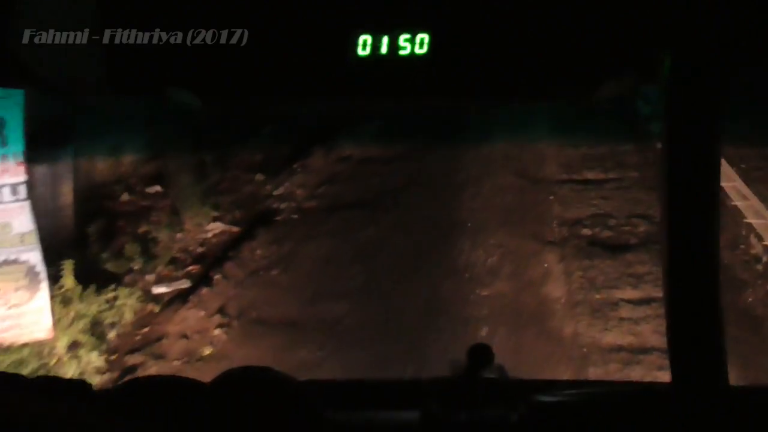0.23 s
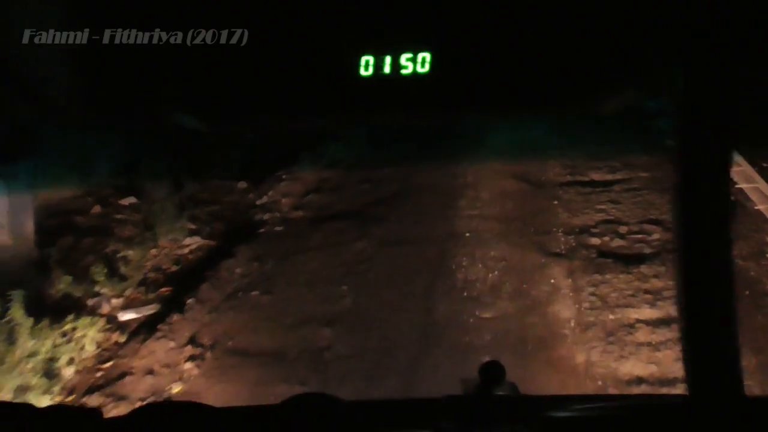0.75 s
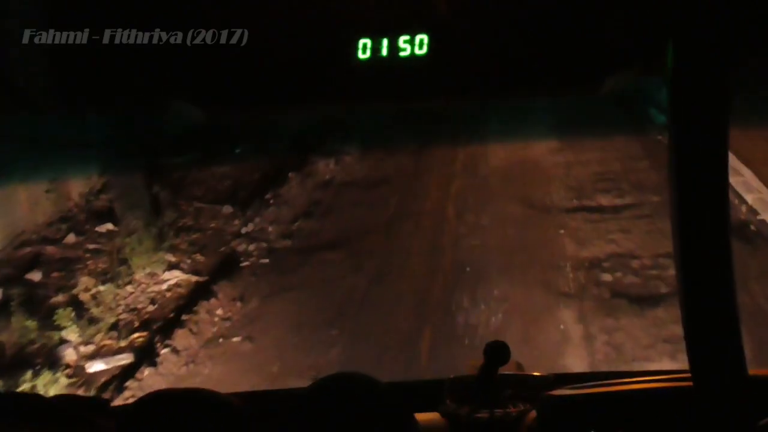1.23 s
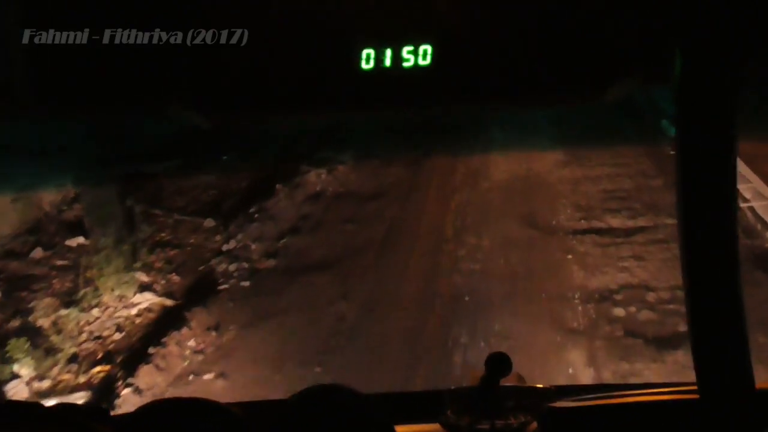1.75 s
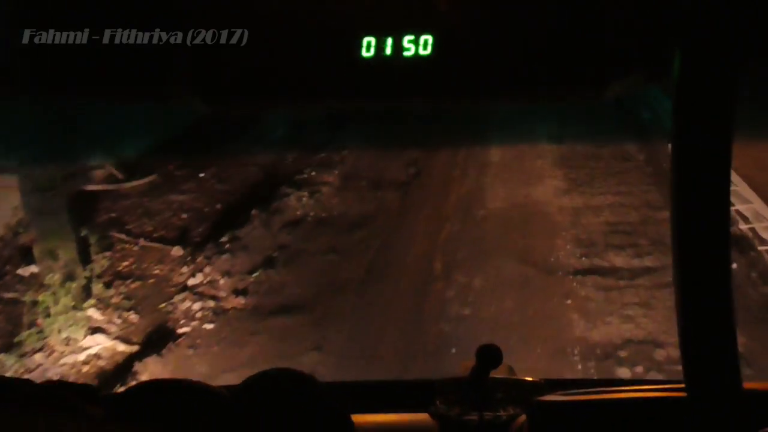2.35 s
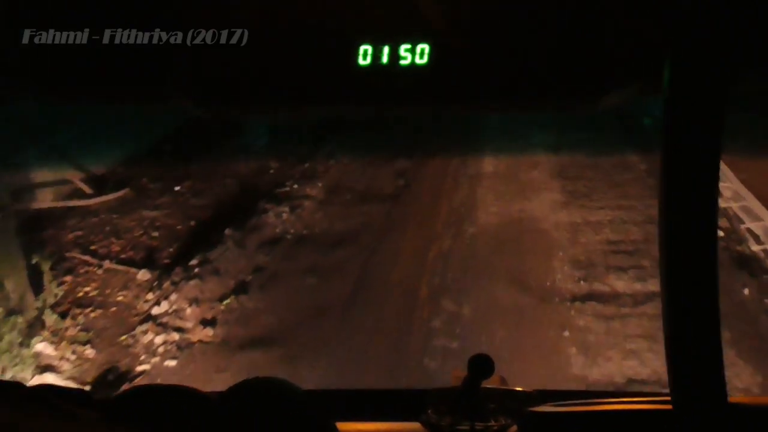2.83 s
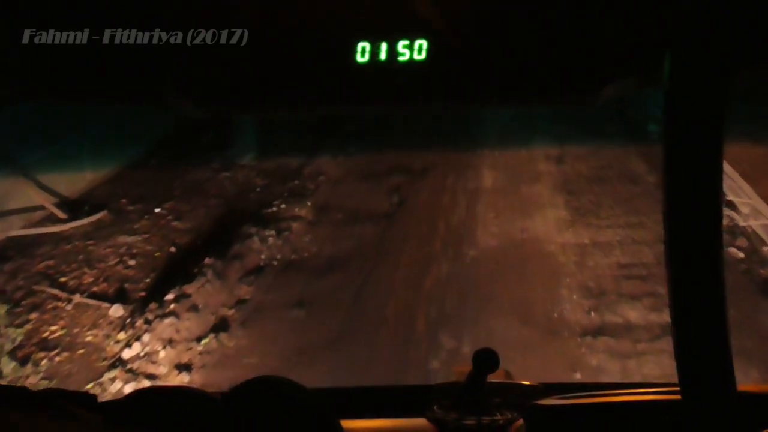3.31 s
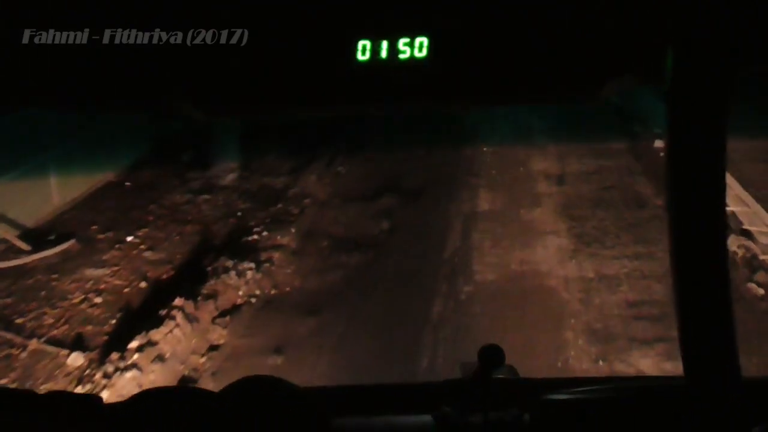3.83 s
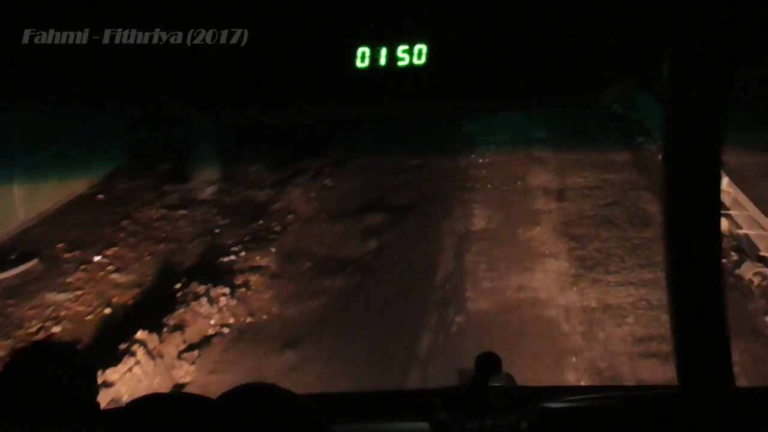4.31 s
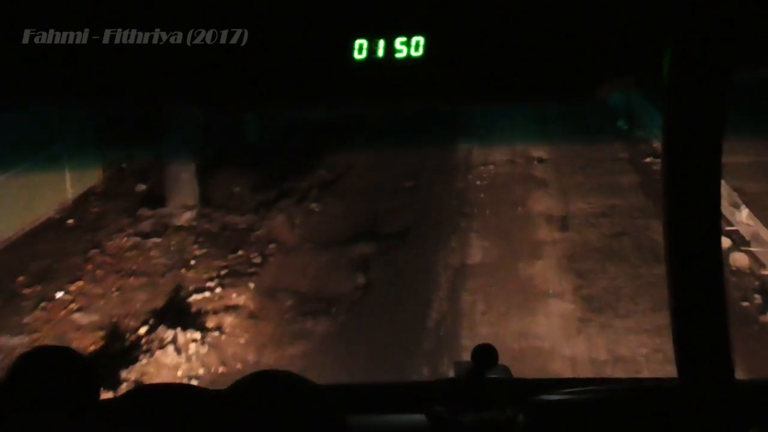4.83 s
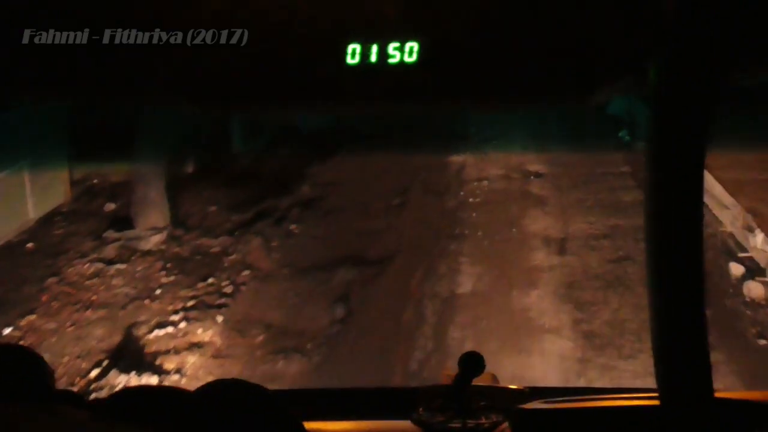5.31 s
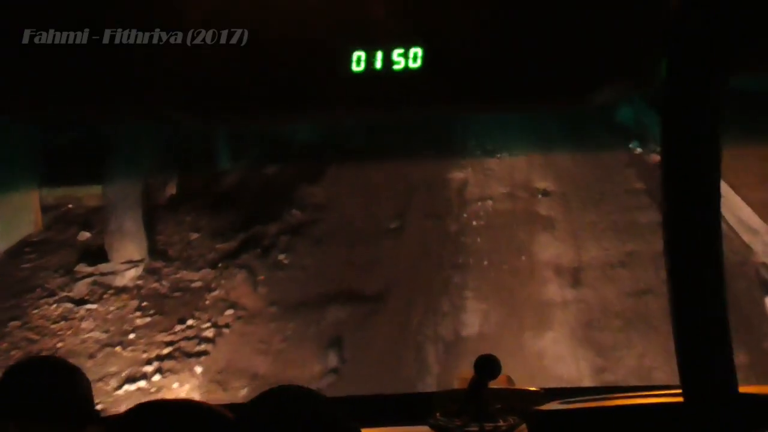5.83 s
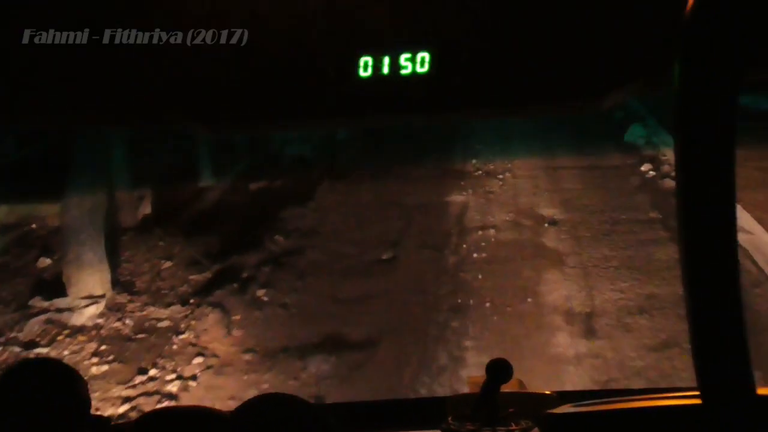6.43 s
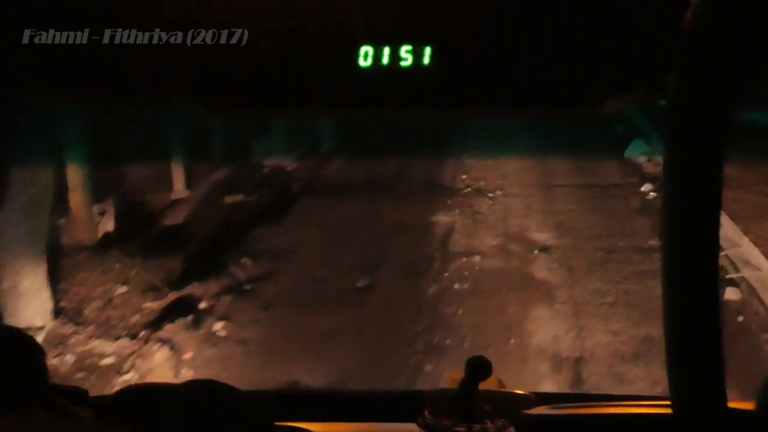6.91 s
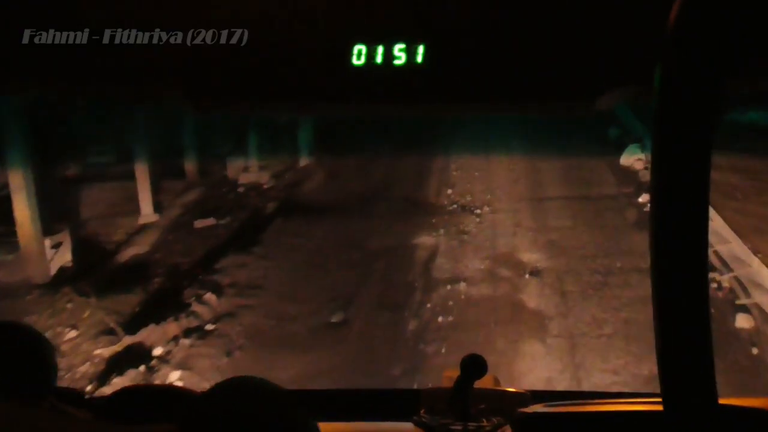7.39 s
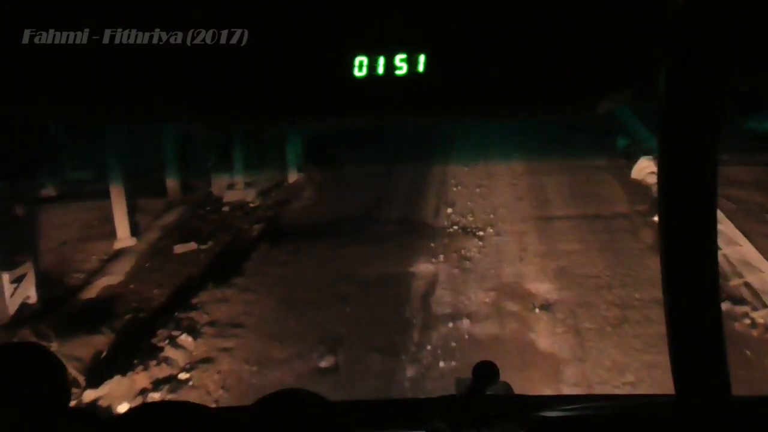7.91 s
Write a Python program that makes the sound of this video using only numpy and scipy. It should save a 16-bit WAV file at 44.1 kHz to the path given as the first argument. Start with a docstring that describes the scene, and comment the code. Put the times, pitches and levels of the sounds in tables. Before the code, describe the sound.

Inside a slow bus on a potholed track: deep body rumble, dull thuds in bursts, loose panels tapping, window glass ticking and trim crunching.

```python
"""A hard thud and a burst of crunching trim come first, then the steady low boom of a coach on a broken dirt road.
The road forces the body shell as shaped noise, and potholes excite its damped modes as thuds.
Loose trim and window panes chatter all the time and crunch, tap and tick as filtered noise and decaying notes.
The drive line adds faint tones; two close microphone ports near the windscreen pick it all up."""
import sys
import numpy as np
from scipy import signal
from scipy.fft import rfft, irfft, next_fast_len
from scipy.io import wavfile
from scipy.ndimage import uniform_filter1d, map_coordinates

SR = 44100
rng = np.random.default_rng(int(sys.argv[2]) if len(sys.argv) > 2 else 0)


def materialize(psi):
    """Save the field psi as 16-bit PCM at rate SR to the path in sys.argv[1].

    A 1-D psi becomes a single channel; in a 2-D psi each row is a channel.
    """
    bounded = np.clip(np.atleast_2d(psi).T, -1, 1)
    quanta = np.round(bounded * 32767).astype(np.int16)
    wavfile.write(sys.argv[1], SR, quanta)


N = 359415


def amp(db):
    """Level to amplitude ratio: 20 dB is a factor of ten."""
    return 10 ** (np.asarray(db) / 20)


def unit(x):
    """Normalisation to a root-mean-square value of 1."""
    return x / np.sqrt(np.mean(x ** 2) + 1e-20)


def left_right(db):
    """Difference split evenly between left and right, in the unit of its argument."""
    return np.array([[.5], [-.5]]) * db


def add_at(out, time_s, sound):
    """Superposition: a sound adds to what is already there from its onset."""
    out[..., round(time_s * SR):][..., :sound.shape[-1]] += sound


def along(points, hz):
    """Interpolation of (frequency [Hz], value) points on a logarithmic frequency axis."""
    f, value = np.transpose(points)
    return np.interp(np.log(hz + 1), np.log(f + 1), value)


def curves(rows):
    """Linear interpolation in time: one curve for each column after the time."""
    time_s, *columns = np.transpose(rows)
    return [np.interp(np.arange(N) / SR, time_s, column) for column in columns]


def wobble(rate):
    """Band-limited random fluctuation: a smooth curve through `rate` random knots a second."""
    knots = rng.standard_normal(int(N * rate / SR) + 4)
    return map_coordinates(knots, [np.arange(N) * rate / SR])


def filtered(x, response):
    """Linear filtering: the spectrum times a complex frequency response."""
    m = next_fast_len(N + SR // 2)
    return irfft(rfft(x, m) * response(np.fft.rfftfreq(m, 1 / SR)), m)[..., :N]


def resonant(modes):
    """Modal sum: causal band-pass resonances (centre [Hz], width [Hz], level [dB]) of alternating sign."""
    def response(f):
        total = 0
        for k, (centre, width, db) in enumerate(modes):
            damping = 1j * f * width
            total = total + (-1) ** k * amp(db) * damping / (centre ** 2 - f ** 2 + damping)
        return total
    return response


def twice_resonated(x, centre_hz, width_hz):
    """Cascaded resonance: a short burst passes twice through one resonance."""
    n = x.shape[-1]
    response = resonant([(centre_hz, width_hz, 0)])(np.fft.rfftfreq(n, 1 / SR))
    return irfft(rfft(x) * response ** 2, n)


# stereo spread of the diffuse sound: (frequency [Hz], side minus mid [dB])
SPREAD = [(25, -20), (60, -14), (110, -15), (200, -12), (380, -7), (700, -3.5), (1290, -3.5), (2380, -7),
          (4400, -2.5), (8120, 0.5), (15000, -2)]


def mid_and_side(noise, spectrum):
    """Mid-side decomposition: two noises take one spectrum, the second also the stereo spread."""
    return filtered(noise, lambda hz: amp(along(spectrum, hz) + [0 * hz, along(SPREAD, hz)]))


PATCHY_DB = 1.5  # different parts take turns in answering the road


def shaken(spectrum, knocks, knock_db, flutter_db):
    """Random forced vibration: patchy noise under a fluctuating force with `knocks` small blows a second."""
    hits = (rng.random(N) < knocks / SR) * amp(1.05 * rng.standard_normal(N))
    decaying = signal.lfilter([1], [1, -np.exp(-1 / (0.0072 * SR))], hits)
    bursts = uniform_filter1d(decaying, size=120)  # softens the attacks
    force = np.sqrt(1 + (amp(knock_db) * unit(bursts)) ** 2) * amp(flutter_db * wobble(9))

    z = signal.stft(rng.standard_normal((2, N)), nperseg=512)[2]
    patches = uniform_filter1d(rng.standard_normal(z.shape[1:]), size=5, axis=0)  # over frequency
    patches = uniform_filter1d(patches, size=8, axis=1)  # over time
    noise = signal.istft(z * amp(PATCHY_DB * unit(patches)), nperseg=512)[1][:, :N]

    mid, side = mid_and_side(force * noise, spectrum)
    return np.array([mid + side, mid - side]) / np.std(mid)


# drive line: (time [s], gear pitch [Hz], gear level [dB], engine drone level [dB])
DRIVE_LINE = [(0, 151.3, -48, -31.5), (.6, 149.2, -47, -58), (1.3, 146.8, -54, -45), (1.7, 142.4, -45, -54),
              (2.2, 142.1, -47, -64), (3.0, 138.4, -45.5, -50), (3.4, 143.2, -49.5, -62),
              (4.8, 148.1, -57.5, -48), (5.4, 151.4, -49.5, -49), (6.0, 151.1, -46, -64),
              (7.3, 162.2, -50.5, -54), (8.15, 163.3, -50, -52)]
THIRD_DB = -9  # third harmonic, relative to the gear tone
ENGINE_ORDER = .362  # drone pitch over gear pitch


def drive_line():
    """Periodic excitation: gear tone, third harmonic and engine order share one shaft speed, each unsteady."""
    gear_hz, gear_db, engine_db = curves(DRIVE_LINE)

    def tone(hz, db):
        level = np.sqrt(2) * amp(db + 0.53 * wobble(14.0))
        cycles = np.cumsum(hz * (1 + 0.00389 * wobble(5.5))) / SR
        return level * np.sin(2 * np.pi * cycles)

    gear = tone(gear_hz, gear_db)
    return gear + tone(3 * gear_hz, gear_db + THIRD_DB) + tone(ENGINE_ORDER * gear_hz, engine_db)


# spectral shapes of the shaken parts: (frequency [Hz], relative spectral density [dB])
SWAY_SHAPE = [(8, -39), (13, 1.5), (19, 5), (25, -2.5), (33, -11), (42, -11), (55, -6), (70, 0.5),
              (85, -0.5), (105, -2), (140, -9), (240, -120)]
BOOM_SHAPE = [(56, -67), (95, -16.5), (135, -0.5), (156, 0), (170, 5), (192, 1), (260, -1.5), (360, -8),
              (470, -24.5), (790, -120)]
PANEL_SHAPE = [(200, -16.5), (340, -7), (385, 0.5), (407, -2), (437, 1.5), (506, -4), (720, -8),
               (752, -4.5), (790, -11), (900, -11.5), (1210, -19.5), (1360, -19), (1800, -30), (2340, -33),
               (3960, -120)]
CHATTER_SHAPE = [(1030, -7.5), (1750, -7), (2110, 0.5), (2460, -4.5), (2900, -5.5), (3400, -4.5),
                 (3900, -5.5), (4400, -7.5), (5000, -10.5), (6200, -16.5), (8060, -17.5), (13600, -120)]
AIR_SHAPE = [(2500, -30), (4500, -13), (5600, -21), (6400, -13), (7970, -4), (9660, -1.5), (10300, -3.5),
             (11200, -1.5), (12300, -4), (14400, -9), (15300, -11), (15600, -29)]
# how hard the surface shakes the coach, before the blows add to it:
# (time [s], low boom [dB], chassis sway [dB], panel drumming [dB], trim chatter [dB])
ROUGHNESS = [(0.0, -29, -34, -33, -52), (0.2, -35, -41.5, -41.5, -59), (0.95, -37.5, -45, -43, -62),
             (1.38, -38.5, -45, -46.5, -64.5), (1.93, -40.5, -47.5, -46, -67),
             (3.13, -39.5, -46, -45.5, -66.5), (3.38, -41, -47, -46, -64.5), (3.72, -41, -46, -45, -66),
             (4.11, -40, -47, -47.5, -63.5), (4.49, -38.5, -45, -45, -67.5),
             (5.01, -36.5, -39.5, -45, -65.5), (5.45, -37.5, -46, -44, -63), (5.79, -38, -43.5, -44, -65.5),
             (6.29, -35.5, -42.5, -43.5, -59.5), (6.76, -37, -41, -41.5, -61),
             (7.17, -36.5, -42, -44, -60.5), (7.74, -40, -45.5, -46.5, -64.5),
             (8.15, -34.5, -43, -43.5, -66.5)]
SWAY_UNSTEADY_DB = -0.5  # small random unsteadiness of the sway level
AFTERSHAKE_DB, HEAVE_DB = -14, -22.5  # boom and sway that a blow stirs up, relative to its peak
AIR_DB, AIR_GROWS = -72.5, 0.47  # mean hiss level; dB that it gains for each dB of chatter


def road():
    """Forced vibration: the rough road drives chassis, shell, panels and trim; air leaks past the seals."""
    boom_db, sway_db, panel_db, trim_db = curves(ROUGHNESS)
    blow_power = aftershake()

    def stirred(db, blow_db):  # powers add
        return np.sqrt(amp(2 * db) + amp(2 * blow_db) * blow_power)

    sway_level = stirred(sway_db + SWAY_UNSTEADY_DB * wobble(8.3), HEAVE_DB)
    sway = sway_level * shaken(SWAY_SHAPE, 9, knock_db=-14, flutter_db=1.2)
    boom = stirred(boom_db, AFTERSHAKE_DB) * shaken(BOOM_SHAPE, 22, knock_db=-16, flutter_db=0.4)
    panels = amp(panel_db) * shaken(PANEL_SHAPE, 28, knock_db=-23, flutter_db=0.9)
    trim = amp(trim_db) * shaken(CHATTER_SHAPE, 60, knock_db=-9.5, flutter_db=1.1)
    air_db = AIR_DB + AIR_GROWS * (trim_db - trim_db.mean())
    air = amp(air_db) * shaken(AIR_SHAPE, 34, knock_db=-14, flutter_db=0.4)
    return sway + boom + panels + trim + air


AFTERSHAKE_T60 = 0.45  # s


def aftershake():
    """Exponential decay of stored energy: every blow leaves the body shaking; returns power over time."""
    time_s, db = np.transpose(BLOWS)[:2]
    kicks = np.bincount(np.round(time_s * SR).astype(int), amp(2 * db), N)
    fading = signal.lfilter([1], [1, -amp(-2 * 60 / (AFTERSHAKE_T60 * SR))], kicks)
    return np.abs(uniform_filter1d(fading, size=500, origin=240))


# body shell modes: (frequency [Hz], relative level [dB], t60 of the mode alone [s])
SHELL_MODES = [(58, -4, .3), (80.7, 22, 0.093), (122, -6, 0.1), (142, 3, 0.18), (172.7, 12.5, 0.6),
               (192.5, 3.5, 0.18), (202, 2.5, 0.26), (218.4, 14, 0.13), (257, 6, 0.29), (280, 14, 0.4),
               (335, 11, 0.069), (387.7, 20.5, 0.038), (430, -6, 0.041), (520, -5, .1)]
# wheels meeting holes and stones:
# (time [s], peak of the shell ring [dB], pitch that the blow favours [Hz], panel slap [dB])
BLOWS = [(0.0, -17, 180, -30), (0.011, -24, 58, -40), (0.032, -21, 160, -29), (0.07, -27, 200, -45),
         (0.23, -31, 172, -45), (0.49, -27.5, 181, -31.5), (0.66, -17.5, 214, -31), (0.662, -26, 62, -55),
         (0.699, -23, 186, -46), (0.746, -32, 165, -31), (0.848, -28, 290, -45), (1.115, -30, 119, -31.5),
         (1.32, -27, 159, -49), (1.43, -25.5, 184, -43), (1.656, -26.5, 187, -32), (1.698, -30.5, 175, -35),
         (2.899, -32, 141, -48), (3.491, -27, 200, -39), (3.665, -24, 190, -55), (3.783, -27, 210, -37),
         (3.829, -24, 381, -40), (3.843, -26, 210, -42), (3.846, -32, 80, -50), (4.742, -23, 223, -38),
         (4.796, -22, 184, -35), (5.043, -20.5, 170, -44), (5.078, -26.5, 236, -39), (5.165, -26, 164, -35),
         (5.472, -28.5, 173.2, -47), (5.688, -24, 181, -32), (5.719, -23, 158, -31), (5.754, -25, 162, -29),
         (5.919, -44, 428, -38), (6.127, -28.5, 187, -41), (6.198, -23.5, 118, -55),
         (6.314, -20.5, 215, -35.5), (6.337, -24, 190, -45), (6.362, -21, 350, -33.5),
         (6.382, -25, 230, -40), (6.527, -26.5, 117, -48), (6.58, -26.5, 286, -32),
         (6.618, -24.5, 207, -32), (7.418, -26, 200, -31), (7.78, -29, 198, -50)]
SHUDDER_T60, SHUDDER_GROWS = 0.11, 0.4  # further decay at -29.5 dB [s]; dB longer for each dB of blow


def thuds():
    """Modal excitation: a blow rings the shell modes near its pitch, a hard one longer, and slaps the panels."""
    shell, slap, t = np.zeros(N + SR), np.zeros((2, N + SR)), np.arange(SR // 3) / SR
    for time_s, db, hz, slap_db in BLOWS:
        ring = 0
        for mode_hz, level, t60 in SHELL_MODES:
            mode_db = level + rng.normal(0, 2.5) - 66 * np.log2(mode_hz / hz) ** 2
            ring = ring + amp(mode_db - 60 * t / t60) * np.sin(2 * np.pi * mode_hz * t)
        shudder_t60 = SHUDDER_T60 * amp(SHUDDER_GROWS * (db + 29.5))
        ring = ring * amp(-60 * t / shudder_t60) * (1 - np.exp(-t / 0.0042))
        add_at(shell, time_s, amp(db) * ring / np.abs(ring).max())

        slap_shape = amp(slap_db - 60 * t / 0.17) * (1 - np.exp(-t / 0.014))
        add_at(slap, time_s, slap_shape * rng.standard_normal((2, len(t))))

    # gain of the panels for white noise
    panel_gain = np.sqrt(np.mean(amp(along(PANEL_SHAPE, np.linspace(0, SR / 2, num=8000))) ** 2))
    mid, side = mid_and_side(slap[:, :N], PANEL_SHAPE) / panel_gain
    return shell[:N] + np.array([mid + side, mid - side])


# loose fittings tapping their mounts; the second note fades faster: (time [s], first note [dB],
# first pitch [Hz], left minus right [dB], second pitch [Hz], second note [dB])
FITTINGS = [(0.233, -35.5, 439, 6, 1250, -56), (0.558, -46, 467, -6, 1520, -44.5),
            (0.629, -38, 574, -6, 1070, -49), (0.846, -37, 605, -6, 1130, -44),
            (1.054, -43, 432, -8, 1250, -45), (1.112, -34.5, 519, -3, 1050, -53),
            (1.43, -35, 430, 2, 1413, -41.5), (1.655, -35, 550, 2, 1260, -45),
            (1.705, -36, 483, -2, 1260, -59), (2.208, -41, 378, 13, 1260, -47.5),
            (3.294, -34.5, 457, 3, 1120, -54), (3.531, -37, 403, 4, 1150, -43),
            (3.844, -40, 388, -5, 1050, -65), (4.14, -40.5, 634, -1, 1323, -52),
            (4.441, -40, 925, 0, 646, -44), (4.481, -37, 457, 1, 974, -42), (4.829, -46, 410, 1, 1437, -47),
            (5.179, -33, 487, 2, 1041, -45), (5.693, -29, 405, -2, 1010, -65),
            (5.916, -30, 437.7, -2, 1290, -48), (6.169, -53, 517, 1, 986, -46),
            (6.359, -26.5, 393, -1, 1420, -37), (6.371, -34, 628, -2, 1170, -43),
            (6.378, -45, 605, 0, 1250, -40), (6.389, -46, 954, 0, 1490, -44),
            (6.526, -42, 413, 4, 1064, -52), (6.601, -33.5, 593, 0, 1090, -52),
            (6.769, -51, 468, -1, 1550, -47), (6.972, -36, 530, 5, 1070, -46),
            (7.309, -43, 400, -4, 1330, -45), (7.341, -46, 393, -1, 1080, -52),
            (7.42, -37, 628, 6, 1347, -42), (7.432, -41, 590, 2, 1470, -53),
            (7.438, -38, 473, 3, 1280, -52), (7.458, -42.5, 330, 0, 1000, -55),
            (7.496, -43, 675, -1.5, 970, -57), (7.756, -48, 390, -.5, 1010, -55),
            (8.085, -36.5, 424, -10, 990, -54), (8.112, -39, 502, -4, 1040, -58)]
TAP_T60, SECOND_T60 = 0.12, 0.088  # decay of both notes; further damping of the second note [s]


def taps():
    """Damped free vibration: each fitting gives two short decaying notes with a soft start."""
    out, t = np.zeros((2, N + SR)), np.arange(SR // 8) / SR
    fade = amp(-60 * t / TAP_T60) * (1 - np.exp(-t / 0.0012))
    for time_s, db, hz, pan_db, second_hz, second_db in FITTINGS:
        # a loose mount blurs the notes
        wander = uniform_filter1d(np.cumsum(rng.normal(0, 0.039, len(t))), size=40)
        first = amp(db) * np.sin(2 * np.pi * hz * t + wander)
        second = amp(second_db - 60 * t / SECOND_T60) * np.sin(2 * np.pi * second_hz * t + wander)
        add_at(out, time_s, amp(left_right(pan_db)) * (first + second) * fade / fade.max())
    return out[:, :N]


# window frame modes: (frequency [Hz], relative level [dB], t60 [s])
FRAME_MODES = [(1150, -3, .05), (1650, 4, .04), (1920, -4, 0.055), (2210, 4, 0.02), (2580, 0.5, 0.024),
               (2820, -0.5, 0.028), (3110, -0.5, 0.048), (3490, 2, 0.021), (3770, -0.5, 0.019),
               (4200, -8, 0.017), (4480, 3, 0.031), (5300, -1, 0.035)]
# single hard ticks of metal on glass: (time [s], peak of the snap [dB], left minus right [dB],
# snap centre [Hz], peak of the frame ring [dB], pitch that the ring favours [Hz])
GLASS_TICKS = [(0.0408, -54, 1.5, 5000, -39, 2280), (0.0505, -52, 1, 5000, -46, 3500),
               (0.1005, -40, 1, 9500, -39, 2280), (0.1012, -38.5, 0, 4500, -52, 4250),
               (0.1135, -52, 0, 6000, -53, 2900), (0.1331, -56, 1.5, 5000, -42, 2360),
               (0.6864, -50, 6, 8310, -54, 4200), (0.6948, -62, 0, 5000, -46, 3300),
               (0.7581, -54, -3, 6000, -51, 3900), (1.516, -51, 5, 7510, -56, 3600),
               (2.2054, -45, 4, 5200, -48, 3700), (2.2195, -58, -3, 5500, -53, 3500),
               (2.2305, -60, 2, 5000, -54, 3300), (2.438, -63, 5, 5000, -56, 3400),
               (2.659, -58, -2, 4200, -49, 1950), (2.671, -64, 0, 3400, -62, 3300),
               (2.8195, -54, -4, 3300, -46, 2500), (2.833, -62, 0, 3500, -62, 3600),
               (3.021, -66, -2, 4500, -52, 3700), (3.2118, -50, 1.5, 7000, -47.5, 3400),
               (3.4208, -58, 3, 4500, -47, 2310), (3.478, -52, 0, 5000, -56, 2900),
               (3.5155, -56, 7, 4500, -36.5, 2220), (3.521, -52, 3, 3500, -43, 3200),
               (3.533, -39.5, 1, 5200, -38, 2000), (3.543, -51, 2, 3500, -49, 1900),
               (3.8315, -62, 4, 3980, -42.5, 1950), (3.839, -60, 2, 4000, -50, 1700),
               (3.858, -48.5, 20, 8060, -56, 4200), (4.109, -62, 1, 2520, -49, 2300),
               (4.132, -65, 1, 2500, -48, 1950), (4.4398, -50, 2, 9650, -47, 3480),
               (4.444, -39, -8, 9500, -52, 4300), (4.4477, -43, 2, 9350, -43, 4200),
               (4.4505, -46, 3, 7500, -40, 2300), (4.4572, -44, -4, 10000, -54, 3500),
               (4.4636, -57, 1.0, 8500, -62, 4200), (5.7362, -60, 4, 4000, -45, 2200),
               (5.762, -58, 1, 4500, -46, 3300), (6.8823, -57, 3, 10470, -51, 4300),
               (7.672, -55, 0.0, 7970, -52, 4200)]
TICK_WIDTH, HARD_WIDENS = 0.62, 0.63  # resonance width over centre at -40 dB; dB wider for each dB louder


def ticks():
    """Impact: brief contact gives a noise snap, wider when hard, and rings the frame modes near its pitch."""
    out, t = np.zeros((2, N + SR)), np.arange(SR // 16) / SR
    for time_s, db, pan_db, hz, ring_db, ring_hz in GLASS_TICKS:
        noise = rng.standard_normal(len(t)) + .5 * rng.standard_normal((2, len(t)))
        width_hz = TICK_WIDTH * hz * amp(HARD_WIDENS * (db + 40))
        snap = twice_resonated(t * amp(-60 * t / 0.011) * noise, hz, width_hz)

        ring = 0
        for mode_hz, level, t60 in FRAME_MODES:
            mode_db = level + rng.normal(0, 2.9) - 67 * np.log2(mode_hz / ring_hz) ** 2
            cycles = mode_hz * rng.normal(1, 0.017) * t + rng.random()  # slightly detuned, any phase
            ring = ring + amp(mode_db - 60 * t / t60) * np.sin(2 * np.pi * cycles)
        ring = ring * (1 - np.exp(-t / 0.00049))

        both = amp(db) * snap / np.abs(snap).max() + amp(ring_db) * ring / np.abs(ring).max()
        add_at(out, time_s, amp(left_right(pan_db)) * both)
    return out[:, :N]


# resonances of trim, low clacking parts and panes: (frequency [Hz], width [Hz], level [dB])
TRIM_MODES = [(2180, 680, 8.5), (3420, 900, 11), (4140, 2300, 7)]
CLACK_MODES = [(720, 1060, 8.6), (1710, 2240, 2.3)]
PANE_MODES = [(5930, 8300, 10), (8700, 8700, 12.9), (11500, 2700, 8.8)]
# jolts that throw trim and panes against their frames: (time [s], nominal peak [dB],
# pitch of the loudest part [Hz], low clack [dB], bright sizzle [dB], left minus right [dB])
JOLTS = [(0.023, -41, 3000, -58, -52, 0), (0.041, -39, 3450, -56, -65, 0), (0.062, -50, 3600, -44, -68, 3),
         (0.083, -44, 4300, -43.5, -62, 4), (0.112, -51, 3000, -62, -69, -1),
         (0.139, -47, 3980, -44, -61, 0), (0.2894, -51, 3830, -72, -77, 4), (0.434, -47, 3500, -57, -63, 1),
         (0.689, -56, 3350, -53, -61, -1), (0.7363, -45, 3700, -51, -62, 1.5),
         (0.755, -36, 3860, -51, -63, 2), (0.7827, -46, 3370, -45.5, -66, 0),
         (1.051, -42.5, 3950, -46, -61, -3), (1.123, -45, 3100, -49, -61, 0),
         (1.367, -57, 2500, -51, -87, -1), (1.516, -56, 3950, -59, -66, 5),
         (1.7601, -53, 3120, -54, -71, 3), (2.086, -53, 3000, -52, -74, 1),
         (2.207, -64, 3200, -63, -63.5, -1), (2.4375, -61, 3850, -73, -83, 2),
         (2.657, -57, 3610, -50.5, -83, -1), (2.818, -56, 3300, -52, -81, -1),
         (3.018, -50, 3760, -54, -78, -1), (3.034, -57, 3500, -64, -78, 2), (3.119, -59, 3800, -75, -71, 2),
         (3.14, -59, 4500, -75, -75, 1), (3.16, -59, 4500, -80, -73, 1), (3.175, -57, 4550, -75, -72, 1),
         (3.1934, -45, 4320, -76, -66, -1), (3.2124, -55, 2750, -77, -66, 3),
         (3.283, -51, 4200, -60, -72, -1), (3.4208, -47, 2192, -69, -77, 2),
         (3.444, -52, 2400, -52, -71, 0), (3.476, -48, 3070, -60, -68, 4), (3.509, -42, 2305, -54, -59, 3),
         (3.532, -45, 2600, -44, -70, -3), (3.545, -52, 2500, -64, -70, -4),
         (3.558, -55, 2540, -74, -70, 3), (3.823, -45.5, 2800, -54, -79, 1),
         (3.837, -52, 3060, -61, -81, 0), (3.854, -59, 4170, -70, -63, -7),
         (4.0432, -53, 3610, -63, -67, 0), (4.098, -55, 3000, -51, -71, 2),
         (4.125, -54, 2050, -54.5, -76, -1), (4.18, -54, 3220, -66, -71, 0),
         (4.438, -35.5, 4300, -44, -49.5, 2.5), (4.4476, -53, 2300, -72, -77, -6),
         (4.49, -58, 2640, -52, -77, -2), (4.686, -51, 3340, -60, -88, 4),
         (4.748, -47.5, 4000, -61, -79, -1), (4.846, -48, 2650, -49.5, -65, 0),
         (5.172, -50, 3300, -51, -67, 1), (5.22, -49, 3730, -49, -71, 1), (5.5392, -47, 3900, -48, -62, 2),
         (5.721, -45, 2620, -58, -77, -1), (5.7362, -44, 2100, -68, -82, 7),
         (5.763, -41, 3150, -65, -73, 1), (5.781, -59, 2080, -60, -69, -1), (5.848, -54, 4160, -67, -65, 3),
         (5.884, -55, 3600, -47, -73, 2), (6.0014, -55, 3055, -47, -82, -2),
         (6.1375, -51, 3165, -46, -66, 0), (6.1746, -42.5, 1970, -47, -81, -4),
         (6.25, -58, 4410, -62, -70, -1), (6.3568, -49, 3500, -47, -79, 7),
         (6.3828, -48, 1950, -52, -69, -3), (6.5912, -46, 2645, -59, -69, 1),
         (6.7132, -50, 3500, -52, -69, 2), (6.733, -57, 4200, -58, -69, 1),
         (6.883, -55, 4355, -52, -75, -1), (6.965, -44, 3400, -46.5, -64, 3),
         (7.083, -54, 2505, -58, -76, 2.5), (7.14, -59, 4410, -71, -75, -1), (7.22, -64, 4450, -68, -76, 1),
         (7.309, -52, 2580, -47, -78, -2), (7.4237, -52, 3550, -66, -65, 4),
         (7.674, -51, 4250, -56, -63, 3), (7.7004, -58, 2110, -59, -74, -2),
         (7.8975, -54, 3505, -62, -69, -1), (8.104, -57, 2720, -54, -72, 1)]
CRUNCH_RISE_S, CRUNCH_S, CRUNCH_T60 = .005, 0.01, 0.12  # rise; hold and decay at -51 dB [s]
HARD_SHORTENS = 0.23  # dB shorter hold and decay for each dB louder
PART_WIDTH = .26  # resonance width over pitch of the loudest part
CREST_DB = 13  # the peaks of a crunch stand this far over its mean level


def rattles():
    """Noise-excited resonance: a jolt's tiny contacts drive three sets of parts, and one part rings loudest."""
    drive, loudest, t = np.zeros((3, 2, N + SR)), np.zeros((2, N + SR)), np.arange(SR // 5) / SR
    for time_s, db, hz, clack_db, sizzle_db, pan_db in JOLTS:
        age = t * amp(HARD_SHORTENS * (db + 51.0))
        shape = (1 - np.exp(-t / CRUNCH_RISE_S)) * amp(-60 * np.maximum(age - CRUNCH_S, 0) / CRUNCH_T60)
        contacts = amp(4 * map_coordinates(rng.standard_normal(200), [t * 400]) - 1.5)
        placed = amp(left_right(pan_db)) * shape
        levels = amp([db - CREST_DB, clack_db, sizzle_db])[:, None, None]
        add_at(drive, time_s, levels * placed * contacts)
        part = twice_resonated(rng.standard_normal(len(t)), hz, PART_WIDTH * hz)
        add_at(loudest, time_s, amp(db - CREST_DB) * placed * unit(part))

    out = loudest[:, :N]
    for level, modes in zip(drive, (TRIM_MODES, CLACK_MODES, PANE_MODES)):
        noise = rng.standard_normal(N) + 0.72 * rng.standard_normal((2, N))  # partly common to both sides
        # heard through a second like panel, so the skirts are steep
        twice = lambda f: resonant(modes)(f) ** 2
        gain = np.sqrt(np.mean(np.abs(twice(np.linspace(0, SR / 2, num=2000))) ** 2))
        out = out + filtered(level[:, :N] * noise, twice) / gain
    return out


# reverberation of the cabin: (frequency [Hz], t60 [s])
CABIN_DECAY = [(100, 0.11), (1000, 0.15), (4000, 0.28), (10000, 0.1)]


def cabin(x):
    """Reverberation: convolution with noise that decays at a rate set by frequency, slowest near 4 kHz."""
    hz, t, z = signal.stft(rng.standard_normal((2, SR // 3)), SR, nperseg=256)
    decay = amp(-60 * t / along(CABIN_DECAY, hz)[:, None])
    tail = signal.istft(z * decay, SR, nperseg=256)[1]
    return signal.fftconvolve(x, tail / np.linalg.norm(tail[0]), axes=1)[:, :N]


CABIN_DB = -7  # reverberation relative to the direct crunch


def scene():
    """Superposition: hum, steady shaking, thuds, and the crunching parts with their short reverberation."""
    crunch = taps() + ticks() + rattles()
    return drive_line() + road() + thuds() + crunch + amp(CABIN_DB) * cabin(crunch)


# colour of the two ports: (frequency [Hz], left minus right [dB])
PORT_COLOUR = [(20, -2), (40, -3), (60, -2.5), (110, -0.5), (200, -2), (380, -2), (700, -0.5), (1290, 2),
               (2380, 1.5), (4400, 0.5), (8120, 0), (15000, -2)]
# phase of the two ports: (frequency [Hz], phase by which left leads [rad])
PORT_PHASE = [(120, 0), (260, .1), (780, .4), (1460, -.4), (4480, -1.1), (7320, -3.6), (10900, -6.2),
              (15700, -6.3)]
TOP_HZ = 15750  # band limit


def record(dry):
    """Spaced pick-up: the two ports differ in colour and phase; nothing passes above the band limit."""
    def ports(hz):
        colour = amp(left_right(along(PORT_COLOUR, hz)))
        phase = np.exp(1j * left_right(along(PORT_PHASE, hz)))
        return colour * phase * (hz < TOP_HZ)
    return filtered(dry, ports)


dry = scene()
out = record(dry)
materialize(out)
```